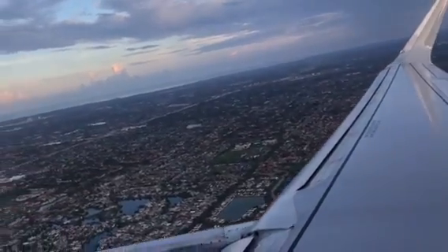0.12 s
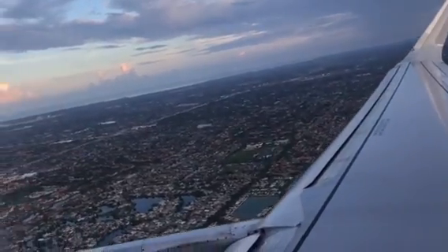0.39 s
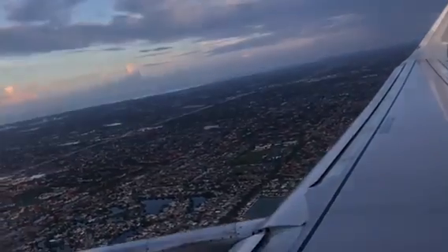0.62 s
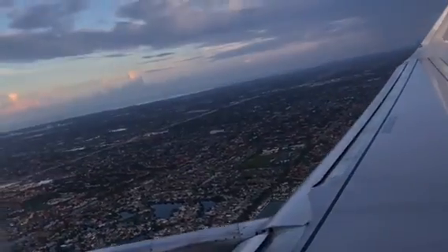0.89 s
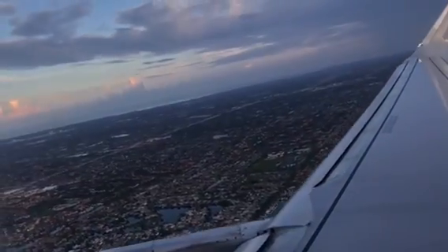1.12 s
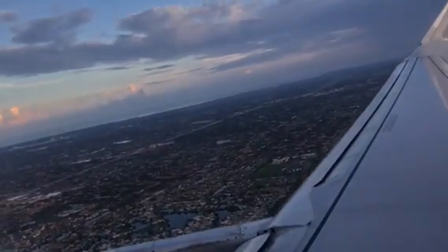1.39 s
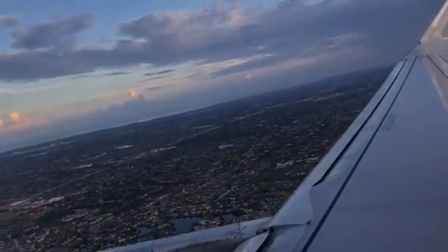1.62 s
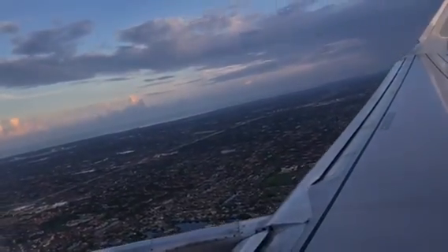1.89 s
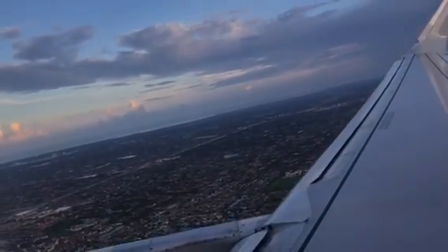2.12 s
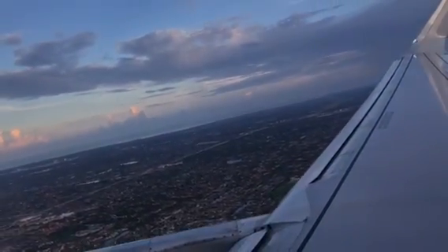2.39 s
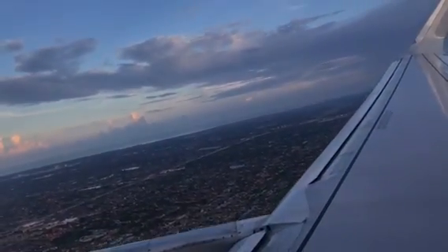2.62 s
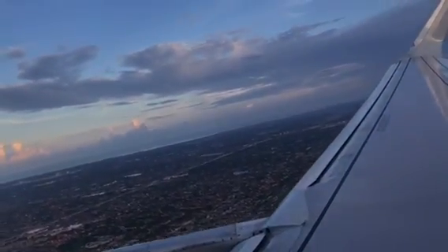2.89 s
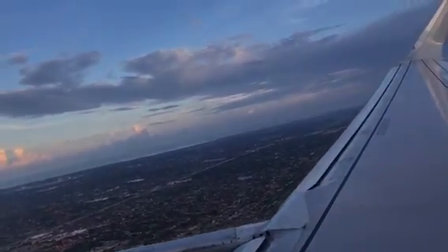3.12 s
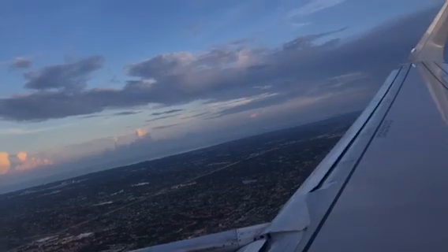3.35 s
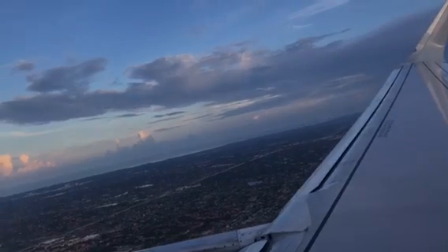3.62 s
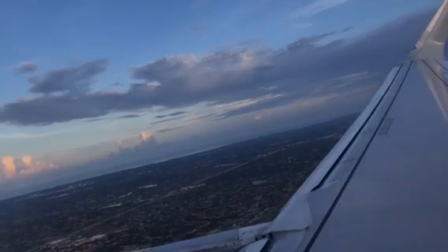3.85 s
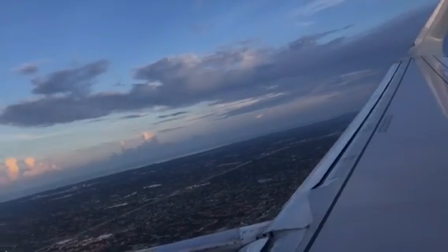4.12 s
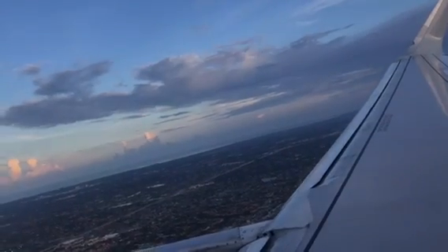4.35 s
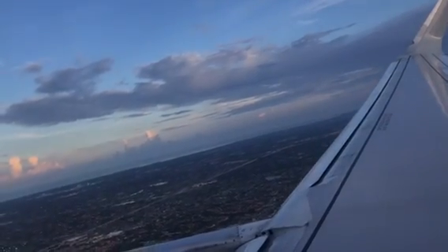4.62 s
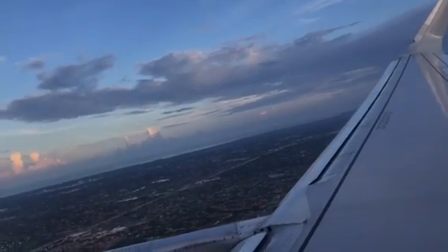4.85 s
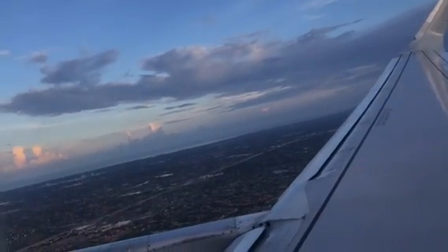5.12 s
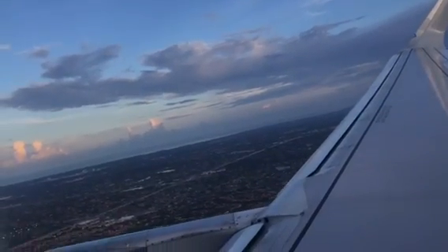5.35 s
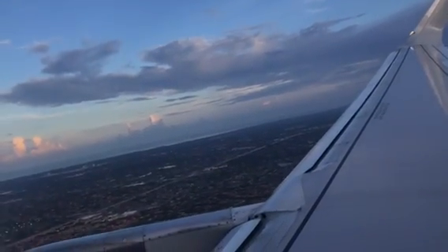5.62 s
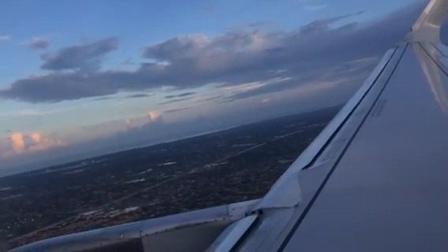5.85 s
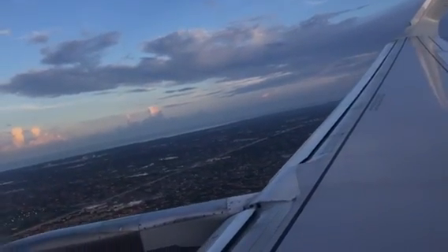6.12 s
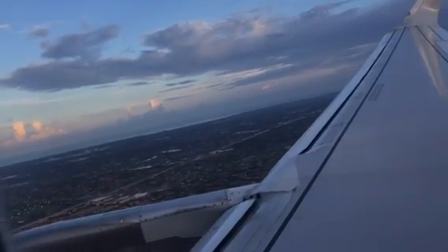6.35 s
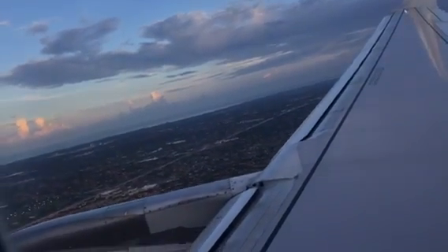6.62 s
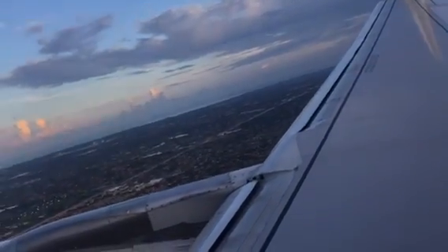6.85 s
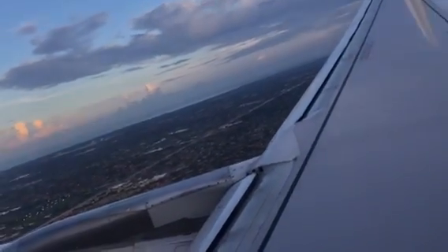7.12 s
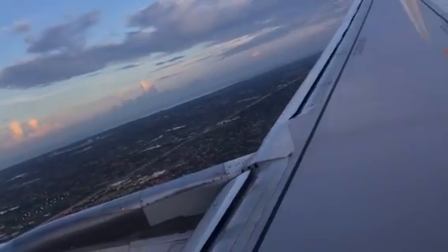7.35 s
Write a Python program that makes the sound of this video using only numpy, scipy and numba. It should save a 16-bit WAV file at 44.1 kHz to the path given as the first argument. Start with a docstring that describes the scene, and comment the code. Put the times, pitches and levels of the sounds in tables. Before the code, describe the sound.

Steady jet cabin noise heard on a phone near the window: broad dark wind roar, faint airy hiss, two close mid-low machine tones and a barely audible thin whistle. Landing-gear doors open with a brief floor thump, then a deep hollow rumble shudders and pulses unevenly, strongest after four seconds. A second muffled thump comes later, with small dry ticks. The roar continues to the end.

```python
"""Airliner cabin on approach

A phone at the window over the wing hears turbulence along the hull, hissing vents, a humming
power supply, a whining pump and a thin fan whistle: shaped noise and slightly wandering tones.
After a thud of decaying floor modes the landing-gear bay opens and booms like a blown bottle,
as unevenly throbbing narrow-band noise with a low shudder beneath. A second, duller thud and faint
treble ticks follow, and the phone's gain control ducks everything when the sound is loud.
"""
import sys
import numpy as np
from scipy import signal
from scipy.fft import rfft, irfft, next_fast_len
from scipy.io import wavfile
from scipy.ndimage import uniform_filter1d
from numba import njit

SR = 44100
rng = np.random.default_rng(int(sys.argv[2]) if len(sys.argv) > 2 else 0)


def how_loud(loudness_db):
    """Turn decibels into a plain amplitude multiplier (0 dB gives 1, 20 dB gives 10)."""
    steps = np.asarray(loudness_db, float) / 20
    return 10 ** steps


def wav_record(signal):
    """Record a signal, one row per channel, as 16-bit PCM in the file named by sys.argv[1]."""
    frames = np.transpose(np.atleast_2d(signal))
    bounded = np.clip(frames, -1, 1)
    # unit amplitude maps onto the largest positive 16-bit level
    quanta = np.round(bounded * 32767).astype(np.int16)
    wavfile.write(sys.argv[1], SR, quanta)


N = 330309
T = np.arange(N) / SR

# Uneven throbbing of the open bay's boom, with surges and brief dropouts. Each row: time in seconds, level in
# dB.
BOOM_THROBS = [(2.0, -24), (2.1, -19), (2.3, -25.5), (3.1, -18), (3.45, -17.5), (3.65, -14.5), (3.86, -12),
               (3.96, -34.5), (4.02, -8.5), (4.15, -36.5), (4.22, -14.5), (4.42, -10), (4.51, -21.5),
               (5.0, -12.5), (5.13, -21.5), (5.21, -8.5), (5.34, -15.5), (5.37, -38), (5.42, -16),
               (5.78, -17.5), (5.98, -11.5), (6.19, -19), (6.23, -35.5), (6.32, -11.5), (6.37, -35),
               (6.46, -11.5), (6.72, -17), (6.85, -10), (6.95, -18), (7.49, -15.5)]
# Gear door and lock blows through the floor. Each row: start in seconds, drive level in dB,
# rattle decay constant in seconds, brightness in dB (in full from 800 Hz up).
THUD_BLOWS = [(2.043, -22, .05, 0), (5.212, -17, .02, -9)]
# Floor modes. Each row: frequency in Hz, relative level in dB, nominal 60 dB decay time in seconds.
FLOOR_MODES = [(110, 2, .08), (180, 0, .06), (280, -3, .045), (365, -1, .045), (450, -4, .05),
               (560, -9, .04), (800, -14, .03), (2300, -29, .01), (2900, -31, .008)]
# Hull turbulence heard through the wall. Each row: frequency in Hz, relative density in dB per Hz.
HULL_SPECTRUM = [(30, 0.5), (90, 3), (115, -2), (160, -1.5), (210, -5.5), (320, -13), (450, -16),
                 (650, -21.5), (735, -24), (1000, -27), (1400, -34), (1950, -40.5), (3000, -52),
                 (5000, -70.5)]
# Cabin and wall-panel resonances. Each row: frequency in Hz, width in Hz, height in dB.
PANEL_PEAKS = [(150, 15, 2), (348, 13, 7.5), (380, 26, 3), (515, 29, 4.5), (536, 54, 3), (598, 23, 4.5),
               (800, 60, 4), (970, 47, 2), (1013, 14, 3.5), (1290, 39, 3), (1812, 91, 4.5)]
# Vent air. Each row: frequency in Hz, relative density in dB per Hz.
VENT_SPECTRUM = [(1500, -24.5), (2200, -7.5), (3050, -10), (3700, -2), (4600, -12), (4900, -15.5),
                 (6000, -17), (7700, -23.5), (9400, -23), (10400, -30.5), (11200, -24), (13000, -29),
                 (13700, -36), (15700, -38.5)]
# Vent nozzle and duct resonances. Each row: frequency in Hz, width in Hz, height in dB.
NOZZLE_PEAKS = [(2463, 61, 8.5), (2783, 47, 9.5), (3385, 250, 3.5), (4116, 110, 6), (4500, 230, 5.5),
                (5250, 78, 6.5), (6640, 300, 2), (8800, 320, 5), (12800, 500, 7.5)]
# Loudness of hull and vent noise, with some of the phone's gain ducking included.
# Each row: time in seconds, hull level in dB (of its middle band), vent level in dB.
AIR_LOUDNESS = [(0, -33, -51.5), (.5, -34.5, -50.5), (3.5, -33.5, -50.5), (4.5, -35, -52),
                (5.8, -33.5, -50.5), (7.49, -31, -52)]
# Pump overtones. Each row: multiple of the fundamental, relative level in dB.
PUMP_OVERTONES = [(1, -3), (2, -23), (3, -28.5), (4, -42)]
# Small ticks of trim or hand on the phone. Each row: start in seconds, peak level in dB,
# centre in Hz, filter width in Hz, 60 dB decay time in seconds before filtering.
TREBLE_TICKS = [(2.4748, -47, 6900, 2000, .04), (2.9746, -40, 8000, 8000, .015),
                (3.186, -50, 7000, 2500, .03), (3.255, -51, 7000, 5000, .08), (4.12, -51, 7000, 2500, .04),
                (5.185, -52, 7500, 9000, .06), (5.23, -52, 7500, 9000, .12),
                (5.285, -45, 15000, 6000, .008), (5.5593, -46, 7000, 12000, .05),
                (5.575, -51, 9000, 12000, .04)]

# Boom centre as the bay opens (it sinks as the aircraft slows); width of one filter pass
BOOM_HZ, BOOM_SAG_HZ_PER_S, BOOM_WIDTH_HZ = 93.1, 3.38, 24.6
SHUDDER_HZ, SHUDDER_WIDTH_HZ, SHUDDER_DB = 49, 15.5, -25  # settled level
# Extra shudder while the doors move, the time of its peak, and the random swing
DOORS_DB, DOORS_PEAK_S, SHUDDER_SWING_DB = 1.5, 0.6, 3
HUM_HZ, PUMP_HZ, WHISTLE_HZ = 409.1, 512.3, 3749.0
HUM_DB, PUMP_DB, WHISTLE_DB = -33, -33, -62.5  # mean levels at the start
HUM_FADE_DB_PER_S, PUMP_FADE_DB_PER_S = 0.3, 0.5


def level(x, db):
    """Root-mean-square scaling: normalise the power, then apply a fixed or moving level."""
    return x * how_loud(db) / np.sqrt(np.mean(x ** 2))


def curves(table):
    """Linear interpolation of each table column to one value a sample."""
    s, *columns = np.transpose(table)
    return [np.interp(T, s, column) for column in columns]


def walk(rate):
    """Slow random fluctuation: normal values held 1 / rate s, smoothed twice, spread near 1."""
    hold = int(SR / rate)
    steps = np.repeat(rng.standard_normal(N // hold + 1), hold)
    slewed = uniform_filter1d(uniform_filter1d(steps, hold), hold)
    return 1.305 * slewed[:N]


def coloured(spectrum, peaks):
    """Spectral shaping: white noise takes on a smooth spectrum with resonances on top."""
    hz = np.maximum(np.fft.rfftfreq(N, 1 / SR), 1)
    points = np.array(spectrum)
    db = np.interp(np.log(hz), np.log(points[:, 0]), points[:, 1])
    for centre, width, top_db in peaks:
        db = db + top_db / (1 + (2 * (hz - centre) / width) ** 2)
    return irfft(rfft(rng.standard_normal(N)) * how_loud(db), N)


@njit
def svf(x, hz, width):
    """Second-order resonance: a state-variable band-pass that may move, gain 1 at the centre."""
    y, band_state, low_state = np.empty(len(x)), 0., 0.
    for i in range(len(x)):
        g, k = np.tan(np.pi * hz[i] / SR), width[i] / hz[i]
        v = (band_state + g * (x[i] - low_state)) / (1 + g * (g + k))
        band_state = 2 * v - band_state
        low_state = low_state + 2 * g * v
        y[i] = k * v
    return y


def band(x, hz, width):
    """Cascaded resonance: two equal passes steepen the skirts, at a fixed or moving centre."""
    hz, width = hz + 0. * T, width + 0. * T
    return svf(svf(x, hz, width), hz, width)


def tone(hz, waver_hz, rate, orders=((1, 0),)):
    """Harmonic series: phase integrates a slightly wandering pitch shared by all multiples."""
    phase = 2 * np.pi * np.cumsum(hz + waver_hz * walk(rate)) / SR
    return np.sqrt(2) * sum(how_loud(db) * np.sin(k * phase) for k, db in orders)


def bay():
    """Cavity resonance: flow over the open bay drives its air column; the airframe shudders below."""
    since = np.maximum(T - THUD_BLOWS[0][0], 0)
    flow = rng.standard_normal((2, N))
    boom = band(flow[0], BOOM_HZ - BOOM_SAG_HZ_PER_S * since, BOOM_WIDTH_HZ)
    # the noise's own envelope is partly flattened, so the level table shapes the throbbing
    envelope = np.abs(signal.hilbert(boom, next_fast_len(N))[:N])
    boom = boom / (envelope / np.std(boom) + 0.22) ** 0.71
    boom = level(boom, curves(BOOM_THROBS)[0] + 1.5 * walk(9))
    doors = since / DOORS_PEAK_S * np.exp(1 - since / DOORS_PEAK_S)
    shudder_db = SHUDDER_DB + DOORS_DB * doors + SHUDDER_SWING_DB * walk(6)
    shudder = level(band(flow[1], SHUDDER_HZ, SHUDDER_WIDTH_HZ), shudder_db)
    opening = np.clip(since / .05, 0, 1)
    return opening * (boom + shudder)


def air():
    """Turbulent noise: hull flow and vent jets excite panels and ducts; both breathe a little."""
    hull_db, vent_db = curves(AIR_LOUDNESS)
    hull = coloured(HULL_SPECTRUM, PANEL_PEAKS)
    vent = coloured(VENT_SPECTRUM, NOZZLE_PEAKS)
    hull = hull / np.std(band(hull, 900, 1200))  # middle band sets the level
    hull = hull * how_loud(hull_db + 0.93 * walk(5))
    return hull + level(vent, vent_db + .5 * walk(8.2))


def thuds():
    """Modal excitation: a short rattle rings the floor; a softer contact leaves high modes quiet."""
    out = 0
    for s, db, rattle, bright_db in THUD_BLOWS:
        decay = (T > s) * np.exp(-np.maximum(T - s, 0) / rattle)
        push = how_loud(db) * decay * rng.standard_normal(N)
        for hz, mode_db, t60 in FLOOR_MODES:
            width = np.log(1000) / np.pi / t60
            gain = how_loud(mode_db + bright_db * min(hz / 800, 1))
            # narrow modes pass less of the noise, so they are raised
            out = out + gain * np.sqrt(SR / width) * band(push, hz, width)
    return out


def machines():
    """Periodic machinery: a steady supply hum, a less steady pump with overtones, a fan whistle."""
    hum_db = HUM_DB - HUM_FADE_DB_PER_S * T + 0.91 * walk(6)
    pump_db = PUMP_DB - PUMP_FADE_DB_PER_S * T + 2.2 * walk(6)
    whistle_db = WHISTLE_DB + 2.3 * walk(25)
    hum = tone(HUM_HZ, 0.79, 3) * how_loud(hum_db)
    pump = tone(PUMP_HZ, 1.5, 6, PUMP_OVERTONES) * how_loud(pump_db)
    whistle = tone(WHISTLE_HZ, 6, 13) * how_loud(whistle_db)
    return hum + pump + whistle


def ticks():
    """Impulsive contact: tiny decaying noise bursts, band-limited mostly to the treble."""
    out = np.zeros(N)
    for s, db, hz, width, t60 in TREBLE_TICKS:
        decay = (T > s) * np.exp(-np.log(1000) * np.maximum(T - s, 0) / t60)
        burst = band(decay * rng.standard_normal(N), hz, width)
        out += how_loud(db) * burst / np.abs(burst).max()
    return out


def scene():
    """Superposition: the pressures of all sources add at one microphone."""
    return (air() + bay() + machines() + thuds() + ticks())[None]


def roll_off(x):
    """The treble ends steeply here."""
    return signal.sosfilt(signal.butter(12, 15719, fs=SR, output="sos"), x)


def record(dry):
    """Dynamic compression: after a steep bass cut, gain follows mean power; peaks saturate softly."""
    x = signal.sosfilt(signal.butter(12, 42, "highpass", fs=SR, output="sos"), dry)
    keep = np.exp(-1 / (.9 * SR))  # 0.9 s averaging
    knee = how_loud(-19) ** 2  # power above which the gain falls
    power = signal.lfilter([1 - keep], [1, -keep], x ** 2, zi=np.full((1, 1), knee))[0]
    x = x * np.minimum((knee / power) ** .22, 1)
    mix = np.tanh(.8 * x) / .8
    return roll_off(mix)


dry = scene()
out = record(dry)
wav_record(out)
```